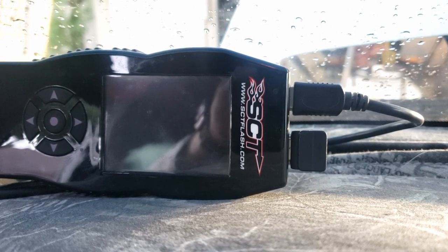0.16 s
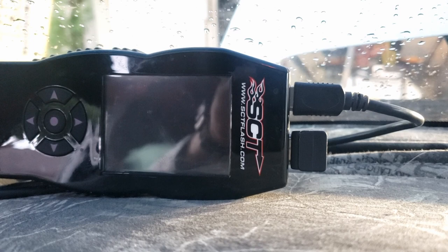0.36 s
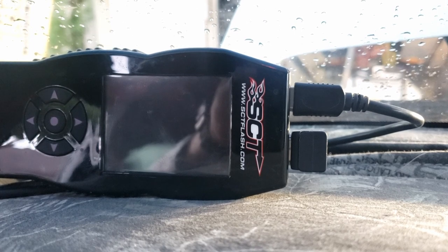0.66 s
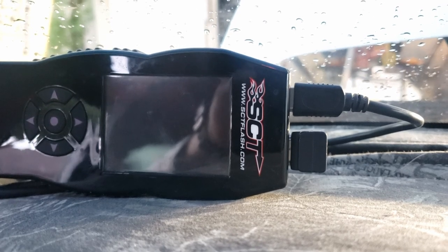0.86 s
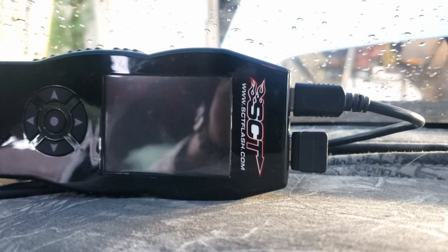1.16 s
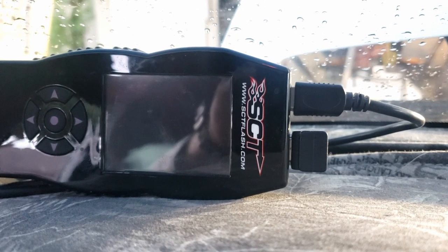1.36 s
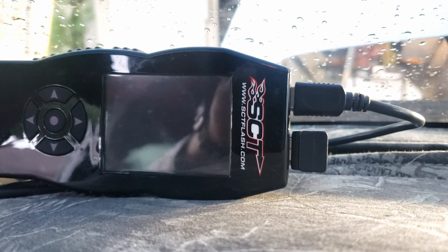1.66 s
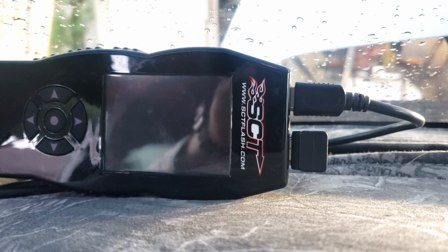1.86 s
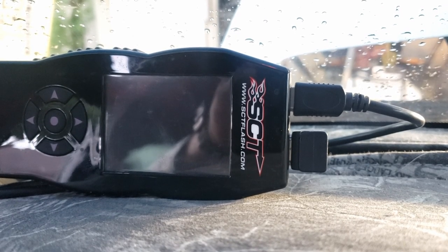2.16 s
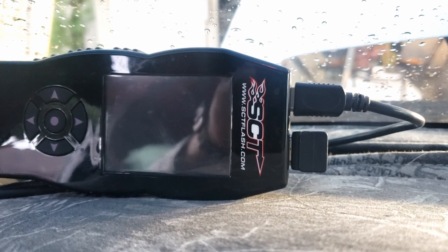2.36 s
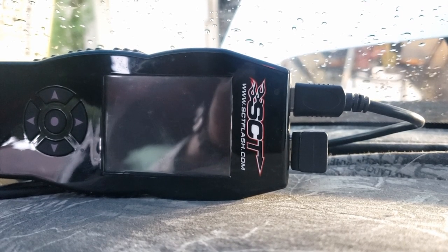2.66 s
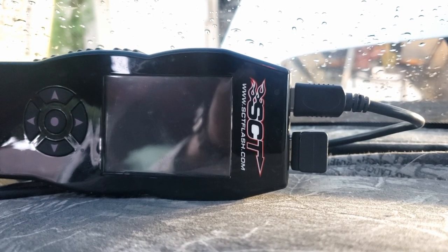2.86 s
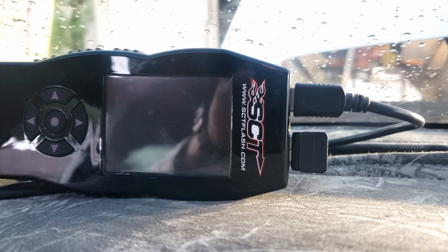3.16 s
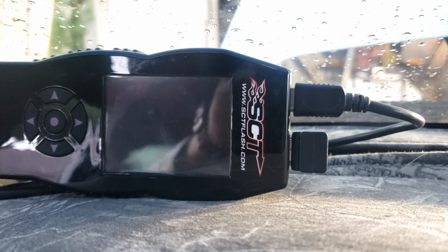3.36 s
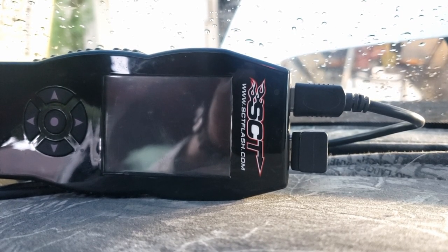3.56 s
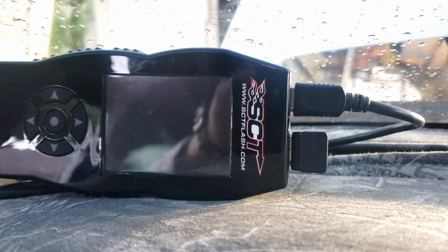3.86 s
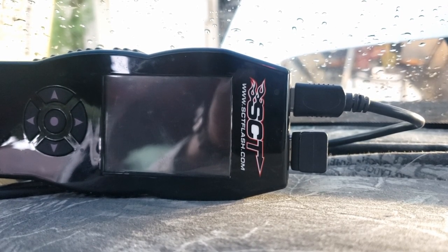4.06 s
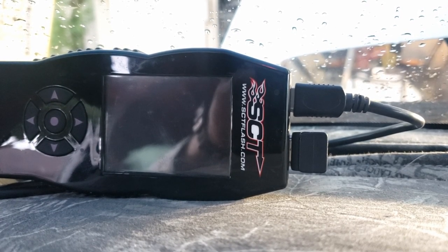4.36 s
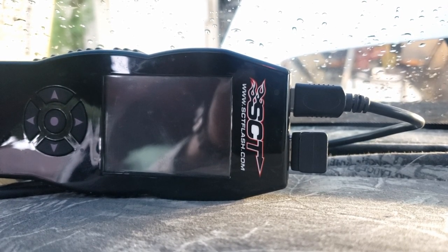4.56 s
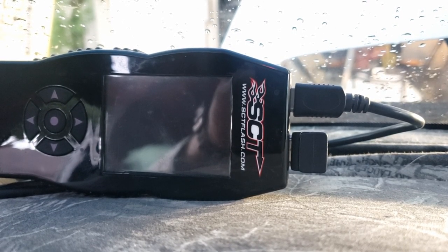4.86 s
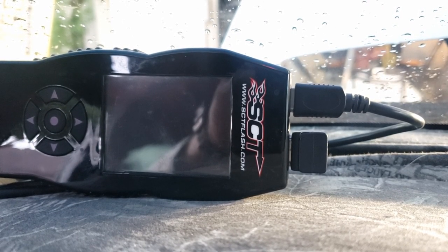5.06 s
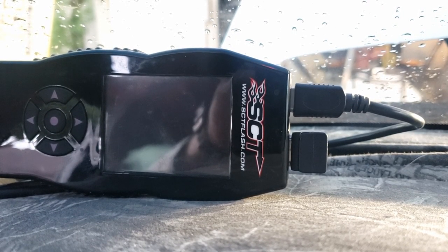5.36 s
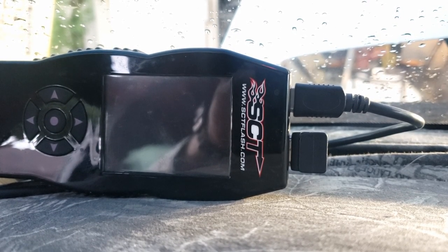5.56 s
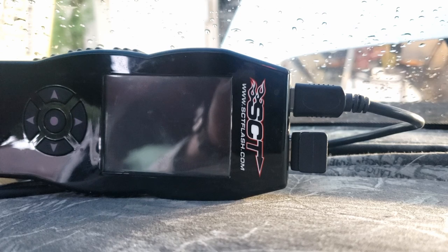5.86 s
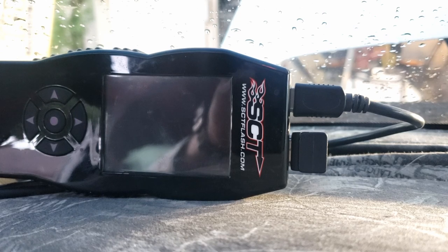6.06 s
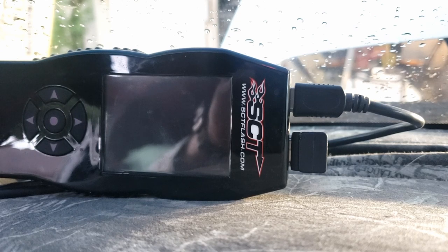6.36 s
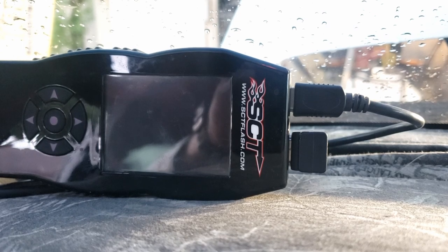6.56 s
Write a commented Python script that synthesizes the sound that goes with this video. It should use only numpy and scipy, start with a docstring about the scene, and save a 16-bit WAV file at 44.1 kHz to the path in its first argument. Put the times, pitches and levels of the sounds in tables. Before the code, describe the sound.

A diesel truck engine cranks briefly, catches, runs at a fast idle and settles to a steady clattering idle, heard inside the cab.

```python
"""A V8 diesel is cranked, catches, runs fast and sinks to idle, heard on the dashboard of the cab.
Each compression loads the starter, whose gear grinds and whines while the cab rocks on its mounts.
Each firing then excites the cab's modes; uneven cylinders give the lope, which changes when the fast
idle ends. Combustion clatter, knocks ringing the block and tones geared to the crank come through
the firewall, with rumble, hiss and a few bright ticks."""
import sys
import numpy as np
from scipy import signal
from scipy.fft import rfft, irfft, next_fast_len
from scipy.io import wavfile
from scipy.ndimage import uniform_filter1d

SR = 44100
rng = np.random.default_rng(int(sys.argv[2]) if len(sys.argv) > 2 else 0)


def store_pcm(level_fs):
    """Save levels as 16-bit WAV."""
    pcm = np.round(np.clip(level_fs, -1, 1) * 32767).astype(np.int16)
    wavfile.write(sys.argv[1], SR, np.atleast_2d(pcm).T)


N = 296793
T = np.arange(N) / SR
FIRING_FROM_S, SETTLE_FROM_S = .74, 3.4
BASS_LEFT_DB = -3.5  # left relative to right

# compression strokes: t/s, grind level/dB, gear level/dB, ring f/Hz, share of the passed rings,
# rocking level at the stroke/dB, rocking level after it/dB
STROKES = [(0.0094, -31.5, -35.5, 1190, 0.67, -29, -18.5), (0.0985, -29.5, -34.5, 1243, 0.097, -31, -18.5),
           (0.188, -30.5, -35, 1237, 0.48, -26, -16), (0.279, -30.5, -36.5, 1215, 0.49, -24.5, -19),
           (0.367, -31.5, -36, 1210, 0.55, -57, -15), (0.462, -32, -38.5, 1244, 0.66, -22.5, -22),
           (0.5465, -32, -35.5, 1214, 0.47, -33.5, -16.5), (0.6433, -30, -36.5, 1223, 0.31, -23, -21),
           (0.74, -31.5, -58, 1210, 0.37, -53, -20.5)]
# envelope of the clatter: t/s, level/dB
CLATTER_LEVEL = [(.75, -24.5), (.85, -30.5), (.97, -35), (1.15, -42), (1.5, -44), (2.9, -44), (4.6, -42.5),
                 (5.4, -42), (5.56, -42), (5.75, -42), (6.2, -41), (6.45, -39), (6.73, -39)]
# knocks of a cycle: crank angle/firings, f/Hz, width/octaves, relative level/dB, length/firings
KNOCKS = [(0.79, 1600, 0.24, 3, 0.17), (0.109, 2700, 0.3, 3, 1.3), (1.2, 2000, 0.17, 2.5, 0.31),
          (2.8, 2610, 0.14, 5.5, 0.42), (2.4, 2000, 0.085, 4.5, 0.18), (2.6, 1700, 0.063, 4.5, 0.28),
          (.8, 840, 0.9, 3.5, 0.25), (1.9, 1000, 0.27, 6, 0.23), (1.8, 970, 0.12, -0.5, 0.77),
          (3.756, 690, 0.54, 2, 0.35), (7.4, 1400, 0.42, -9.5, 0.34), (7.3, 1650, 0.99, -6.5, 0.34),
          (2.191, 977, 0.11, 7, 1.3), (7, 1510, 0.18, -15.5, 2.8)]
# modes of the engine block: f/Hz, width/Hz, share
BLOCK_MODES = [(600, 47, .3), (840, 30, 0.49), (1050, 72, 0.45), (1192, 20, 0.87), (1423, 20, 0.93),
               (1570, 60, 0.37), (1993, 45, 0.7), (2370, 50, 0.6), (2620, 110, .7), (2830, 110, 0.8)]
# left microphone relative to right: f/Hz, level/dB
LEFT_DB = [(60, -2.5), (200, -4.5), (380, 3.5), (700, -3.5), (1290, 8), (2380, 4.5), (4400, 5), (8120, 1.5),
           (15000, 2)]


def amp(db):
    """Amplitude ratio of a level in decibels."""
    return 10 ** (np.asarray(db, float) / 20)


def unit_rms(x):
    """Normalisation to unit mean power."""
    return x / np.sqrt(np.mean(x ** 2) + 1e-20)


def bell(x, centre, width):
    """Gaussian curve, down to 1/e one width from its centre."""
    return np.exp(-((x - centre) / width) ** 2)


def ramp(start_s, length_s):
    """Linear rise from 0 to 1."""
    return np.clip((T - start_s) / length_s, 0, 1)


def at_frequency(points, hz):
    """Interpolation along a logarithmic frequency axis."""
    f, value = np.transpose(points)
    return np.interp(np.log(hz + 1), np.log(f + 1), value)


def over_time(rows):
    """Linear interpolation in time, one curve for each column after the first."""
    s, *values = np.transpose(rows)
    return [np.interp(T, s, v) for v in values]


def add_at(out, s, sound):
    """Superposition of a sound that starts at time s."""
    out[..., round(s * SR):][..., :sound.shape[-1]] += sound


def resonate(x, hz, width):
    """A resonance that may glide, by heterodyning: shift hz to zero, smooth, shift back."""
    turn = np.exp(2j * np.pi * np.cumsum(hz * np.ones(len(x))) / SR)
    pole = np.exp(-np.pi * width / SR)
    return 2 * (turn * signal.lfilter([1 - pole], [1, -pole], x / turn)).real


def ringing(modes, rise_s):
    """Impulse response of damped modes: the wider a mode, the faster its sine decays."""
    t = T[:SR // 2]
    ring = sum(share * np.exp(-np.pi * width * t) * np.sin(2 * np.pi * hz * t)
               for hz, width, share in modes)
    return ring * (1 - np.exp(-t / rise_s))


def cyclic_blows(angle, blows, modes, level_db, scatter_db, rise_s=1e-5):
    """Impulse excitation: blows of scattered strength ring the modes once in every eight firings."""
    impulses = np.zeros(N)
    for place, db in blows:
        cycle = np.floor((angle - place) / 8)
        impulses += amp(db) * np.diff(cycle, prepend=cycle[0])
    impulses *= amp(level_db + scatter_db * rng.standard_normal(N))
    return signal.oaconvolve(impulses, ringing(modes, rise_s))[:N]


def block_modes_near(f, octaves):
    """Selective excitation: a knock drives mostly the block modes near its own pitch."""
    return [(hz, width, share * bell(np.log2(hz / f), 0, octaves)) for hz, width, share in BLOCK_MODES]


def at_microphones(mono, hz):
    """Level and time cues of a knock: the right channel is inverted and 20 samples late."""
    left_db = at_frequency(LEFT_DB, hz)
    return np.array([mono * amp(left_db / 2), -np.roll(mono, 20) * amp(-left_db / 2)])


def cab_noise(spectrum, size, shape=lambda s, hz: 1, angle=None):
    """Partly coherent noise at two microphones, scaled by shape; given an angle, part of it recurs."""
    # part of the noise that recurs each cycle: f/Hz, amplitude share
    recurring = [(100, .5), (400, .7), (900, .9), (1600, .88), (2100, .7), (3000, .58), (5000, .42),
                 (9000, .2)]
    # likeness of left and right: f/Hz, correlation
    coherence = [(60, 1), (290, 0.84), (640, 0.37), (2000, 0.51), (4000, 0.14), (15000, 0.12)]
    # lead of the left microphone: f/Hz, phase/rad
    phase_lead = [(45, -0.35), (190, -0.54), (330, 0.88), (520, 1.7), (780, 3), (1210, 4.5), (1720, 4.5),
                  (2840, 5), (4130, 13), (6200, 17), (8010, 21), (8440, 19), (9220, 19.5), (11400, 13),
                  (12700, 6), (16000, 12)]
    # peaks and a notch of the cab: f/Hz, width/Hz, gain/dB
    cab_colour = [(3390, 71, 0.5), (3480, 47, -9), (4270, 270, 4), (4730, 220, 1.5), (4920, 110, 3),
                  (5300, 240, 0.5), (6290, 1020, 6.5)]
    frames = dict(nperseg=size, noverlap=3 * size // 4)
    hz, s, (left, other) = signal.stft(rng.standard_normal((2, N)), SR, **frames)
    hz = hz[:, None]
    if angle is not None:
        first, second = rng.standard_normal((2, 2, 8192))[:, :, (angle % 8 * 1024).astype(int)]
        pattern = first * np.cos(.9 * T) + second * np.sin(.9 * T)  # drifts at 0.9 rad/s
        share = at_frequency(recurring, hz)
        fresh = np.sqrt(1 - share ** 2) * np.array([left, other])
        left, other = share * signal.stft(pattern, **frames)[2] + fresh
    same = at_frequency(coherence, hz)
    right = (same * left + np.sqrt(1 - same ** 2) * other) * np.exp(-1j * at_frequency(phase_lead, hz))
    balance = amp(at_frequency(LEFT_DB, hz) / 2)
    colour_db = sum(db * bell(hz, f, width) for f, width, db in cab_colour)
    in_band = (hz > spectrum[0][0]) & (hz < spectrum[-1][0])
    gain = amp(at_frequency(spectrum, hz) + colour_db) * in_band * shape(s, hz)
    out = signal.istft(np.array([left * balance, right / balance]) * gain, **frames)[1][:, :N]
    return out / np.sqrt(np.mean(out.mean(0) ** 2))


def through_covers(x):
    """Resonant transmission: block and covers favour narrow bands of the noise."""
    # resonances of block and covers: f/Hz, half-width/Hz, gain/dB
    cover_rings = [(850, 25, 1), (1053, 40, 2.5), (1210, 45, 5), (1402, 27, 4.5), (1578, 40, 4.5),
                   (1830, 26, 5), (2000, 42, 6), (2160, 41, 0.5), (2376, 30, 5.5), (2820, 45, 5),
                   (3050, 31, 2.5), (3510, 40, 2.5)]
    size = next_fast_len(N)
    hz = np.fft.rfftfreq(size, 1 / SR)
    lift_db = sum(db / (1 + ((hz - f) / width) ** 2) for f, width, db in cover_rings)
    return irfft(rfft(x, size) * amp(lift_db - 2.5), size)[:, :N]


def starter_whine():
    """Gear mesh under load: each compression slows the starter; its falling whine rings the housing."""
    # rings the whine passes: ratio to the mean main ring, width/Hz, level/dB, t into the stroke/s
    passed_rings = [(1.5, 41, -8, 0.0085), (1.36, 31, -0.5, 0.0069), (1.32, 16, -2, 0.026),
                    (1.1, 15, 5, 0.038), (0.92, 13, -11, 0.038), (.65, 30, -14, 0.038),
                    (2.4, 60, -10, 0.056), (2.4, 19, -8, 0.017), (3.8, 45, -13, 0.027),
                    (2.94, 15, -14, 0.045), (5.45, 42, -12, 0.033)]
    s, _, gear_db, ring_hz, passed_share, *_ = np.transpose(STROKES)
    lead_s, slowest_s, hold_s = .016, .065, .019
    t = T[:SR] + lead_s  # the whine starts to fall just before the grind
    stroke = np.clip(np.searchsorted(s, t) - 1, 0, None)
    age = np.maximum(t - s[stroke], 0)
    load = np.exp(-((age - .054) / .027) ** 4) + .25 * bell(age, .085, .0084)
    swoop_gain = .28 * np.exp(-(age / .096) ** 3) * np.clip(age / .0033, 0, 1)
    mesh_hz = ring_hz[stroke] * (1.13 + .31 * np.cos(np.pi * age / slowest_s))
    # a high rasp sags under load and climbs back
    high_hz = 3850 - 350 * np.cos(2 * np.pi * (age - slowest_s) / np.diff(s).mean())
    level = uniform_filter1d(amp(gear_db[stroke]), 400)
    out = np.zeros((2, N))
    for side, teeth in enumerate(rng.standard_normal((2, SR))):
        rasp = unit_rms(resonate(resonate(teeth, mesh_hz, 110), mesh_hz, 110))
        rasp += .86 * unit_rms(resonate(teeth, 2 * mesh_hz, 90))
        mesh_phase = 2 * np.pi * np.cumsum(mesh_hz) / SR + side
        swoop = .4 * rasp + 1.2 * np.cos(mesh_phase) + .5 * np.cos(2 * mesh_phase)
        main_ring = np.cos(2 * np.pi * np.cumsum(ring_hz[stroke]) / SR + side)
        main_ring += .4 * unit_rms(resonate(teeth, ring_hz[stroke], 50))
        passed = sum(amp(db) * bell(age, peak_s, hold_s)
                     * unit_rms(resonate(teeth, ratio * ring_hz.mean(), width))
                     for ratio, width, db, peak_s in passed_rings)
        housing = 1.35 * load * main_ring + passed_share[stroke] * passed
        high_rasp = amp(-20) * unit_rms(resonate(resonate(teeth, high_hz, 170), high_hz, 170))
        out[side, :SR] = level * (swoop_gain * swoop + housing + high_rasp)
    return out * amp([[6], [-.5]])


def starter_grind():
    """Amplitude-modulated noise: the gear grinds in a burst at each compression."""
    # grinding spectrum: f/Hz, relative density level/dB
    spectrum = [(47, -30), (80, 3), (122, -18), (232, 4), (330, -10), (480, -28.5), (768, -12.5),
                (877, -27.5), (1220, -8), (1860, -20), (2540, -20), (5170, -31.5), (6450, -36),
                (12000, -28), (16000, -39)]
    # resonances of the starter housing: f/Hz, width/Hz, gain/dB
    housing_rings = [(2300, 140, 3.5), (2630, 50, 3), (2860, 50, 2), (3200, 51, -2), (3530, 60, 2),
                     (4400, 74, -2), (5500, 130, 6), (5730, 70, 2), (6200, 80, 8.5), (6720, 90, 8),
                     (7320, 83, 12)]
    s, grind_db, *_ = np.transpose(STROKES)

    def bursts(t, hz):
        stroke = np.clip(np.searchsorted(s, t + .013) - 1, 0, None)
        age = t - s[stroke]
        floor = np.clip(.5 - .092 * np.log2((hz + 1) / 1000), .12, 1)  # duller between strokes
        floor = floor * (1 + .38 * bell(hz, 4000, 790)) * (t < .85)
        burst = np.exp(-(np.maximum(age, 0) / .063) ** 2.5) * np.clip(age / .019 + .67, 0, 1)
        rings_db = sum(db * bell(hz, f, width) for f, width, db in housing_rings)
        return amp(grind_db[stroke] - grind_db.mean() + rings_db) * (floor + burst)
    return amp(-43.5) * cab_noise(spectrum, 256, bursts)


def cab_shudder():
    """Forced vibration: the cab rocks on its mounts, checked at each stroke and swelling after it."""
    rock_hz, swell_s = 61.4, .052
    s, *_, checked_db, swell_db = np.transpose(STROKES)
    times = np.ravel([s, s + swell_s], "F")
    levels = amp(np.ravel([checked_db, swell_db], "F"))
    envelope = uniform_filter1d(np.interp(T, times, levels), 400) * np.clip((.85 - T) / .043, 0, 1)
    return np.sqrt(2) * envelope * np.cos(2 * np.pi * rock_hz * T)


def compression_thuds():
    """Impulse excitation: each stroke rings low modes, every second one 5 dB harder."""
    # modes of the thud: f/Hz, width/Hz, signed share
    modes = [(92, 8.7, 0.65), (121, 20, 0.39), (283, 4.2, 0.097), (335.5, 8.3, -0.15)]
    s, grind_db, *_ = np.transpose(STROKES)
    heavy = np.arange(len(s)) % 2 == 0
    blows = np.zeros(N)
    blows[np.round((s - .002) * SR).astype(int)] = amp(grind_db + 11.5 + 5 * heavy)
    thuds = signal.oaconvolve(blows, ringing(modes, rise_s=.0049))[:N]
    return thuds * amp([[BASS_LEFT_DB / 2], [-BASS_LEFT_DB / 2]])


def combustion_clatter(angle):
    """Cyclostationary noise: valves and combustion swell in set bands at set crank angles."""
    # clatter spectrum: f/Hz, relative density level/dB
    spectrum = [(350, -60), (600, -9.5), (627, -29), (837, 1.5), (915, -5.5), (1040, 1), (1230, 0),
                (1560, 0.5), (1740, -11), (2030, -7.5), (2900, -10), (3350, -14.5), (5050, -18.5),
                (5700, -24), (8500, -28.5), (11000, -36.5), (18700, -120)]

    def knocking(s, hz):
        crank = np.interp(s, T, angle)
        power = 1 + sum(amp(2 * db) * bell(np.log2((hz + 1) / f), 0, octaves)
                        * bell((crank - place) % 8, 0, length)
                        for place, f, octaves, db, length in KNOCKS)
        # once a cycle the pitch drops and climbs again; the upper band thins at the drop
        churn_hz = 1040 + 360 * ((crank - 1.6) % 8 / 8)
        churn_db = 4 * bell(hz, churn_hz, 120) - 6 * bell(hz, 1400, 150) * bell(crank % 8, 2.1, .8)
        power = power * amp(2 * churn_db * np.clip(s / SETTLE_FROM_S, 0, 1))
        return np.sqrt(power / power.mean(1, keepdims=True))
    return through_covers(cab_noise(spectrum, 512, knocking, angle))


def rumble(angle):
    """Low-frequency noise, partly periodic with the engine cycle."""
    # rumble spectrum: f/Hz, relative density level/dB
    spectrum = [(28, -41), (45, -11.5), (110, -8.5), (180, -10), (230, -17), (340, -21), (415, -29.5),
                (480, -24.5), (550, -27.5), (750, -29.5), (1000, -68)]
    # rumble relative to the clatter: t/s, level/dB
    level = [(.75, 8), (1.2, 10.5), (2.0, 9), (2.7, 12), (3.6, 8.5), (5.0, 9), (6.73, 7.5)]
    return amp(over_time(level)[0]) * cab_noise(spectrum, 2048, angle=angle)


def hiss():
    """Broadband hiss, rising 2 dB against the clatter as the fast idle ends."""
    # hiss spectrum: f/Hz, relative density level/dB
    spectrum = [(4120, -34.5), (7000, -3), (7450, -0.5), (9360, -0.5), (10900, 4), (12100, 4.5),
                (15100, -4.5), (16000, -2)]
    return amp(-19 + 2 * ramp(3.8, .45)) * cab_noise(spectrum, 256)


def block_knocks(angle):
    """Modal ringing: the same knocks strike the block in every cycle."""
    out = np.zeros((2, N))
    for place, hz, octaves, db, _ in KNOCKS:
        modes = block_modes_near(hz, octaves)
        knock = cyclic_blows(angle, [(place, db)], modes, 0, scatter_db=1.6, rise_s=.0048)
        out += at_microphones(knock, hz)
    return amp(-9.5) * unit_rms(out)


def catching():
    """Combustion transients: the first firings are decaying noise bursts over the run-up's swell."""
    # hard firings: t/s, relative level/dB
    firings = [(0.7363, -21), (0.7897, -42), (0.834, -22.5), (0.9009, -32), (0.9309, -38), (1.0032, -28),
               (1.0466, -36)]
    # their spectrum: f/Hz, relative density level/dB
    spectrum = [(88, -30), (150, -1), (209, -13), (244, -15), (368, -13), (439, -8.5), (923, -16.5),
                (1210, -13.5), (1830, -18), (2870, -13.5), (3490, -21.5), (5200, -32), (5790, -26),
                (6500, -40), (8400, -33.5), (11900, -32.5), (16000, -45)]
    peak_s, rise_db_per_s, fall_s, t60_s = .947, 41, .13, .12
    late = T - peak_s
    swell_db = -32 + rise_db_per_s * late.clip(None, 0) - 10 * (late.clip(0, 1) / fall_s) ** 2
    envelope = amp(swell_db) * ramp(.723, .015)
    for s, db in firings:
        decay_db = 60 * (T - s).clip(0, 1) / t60_s
        envelope += amp(db - 12 - decay_db) * ramp(s - .0065, .0065) * (T < s + 1)
    return through_covers(cab_noise(spectrum, 498)) * envelope


def firing_pings():
    """Free vibration of metal: hard first firings ring the block around one pitch each."""
    # pings: t/s, level/dB, f/Hz
    pings = [(.737, -25, 1750), (.742, -22, 3000), (.746, -30.5, 1226), (.76, -19, 1660), (.789, -33, 1550),
             (.798, -22, 2000), (.833, -27, 3010), (0.835, -20.5, 1560), (0.839, -19.5, 1120),
             (.842, -24, 2850), (.855, -36, 1190), (.87, -24, 2800), (.876, -23, 1100), (0.903, -18, 1310),
             (.915, -33, 1220), (.945, -34, 3000), (0.959, -29, 1250), (.932, -22, 2060),
             (0.979, -27, 2000), (1.003, -31, 2900), (1.022, -25.5, 1146), (1.05, -31, 1200)]
    out = np.zeros((2, N))
    for s, db, hz in pings:
        modes = [(hz, 70, .9)] + block_modes_near(hz, octaves=.076)
        add_at(out, s, at_microphones(amp(db) * ringing(modes, rise_s=.0019), hz))
    return out


def body_thumps():
    """Structure-borne sound: the catching engine jolts the body, one damped mode to a jolt."""
    # jolts: t/s, level/dB, f/Hz
    jolts = [(0.738, -36, 200), (0.765, -37, 244), (0.787, -24, 231), (0.81, -20, 377), (0.848, -18.5, 350),
             (0.871, -24, 270), (0.89, -16, 240), (0.915, -16.5, 247), (0.957, -19, 242)]
    out = np.zeros(N)
    for s, db, hz in jolts:
        add_at(out, s, amp(db + .5) * ringing([(hz, 53, 1)], rise_s=.003))
    return out * amp([[-1.5], [1.5]])


def crank_angle():
    """Phase as the integral of firing rate, in firings; a cycle of eight begins at 1 s."""
    # engine speed: t/s, firing rate/Hz
    speed = [(.74, 14), (.82, 30), (.9, 44.07), (1.0, 56.79), (1.2, 53.62), (1.5, 53.51), (2.4, 49.53),
             (2.75, 47.01), (4.1, 44.79), (4.5, 44.7), (4.75, 44.18), (5.3, 45.0), (6.73, 45.39)]
    firings = np.cumsum(over_time(speed)[0]) / SR
    return firings - firings[SR]


def exhaust_hum(angle):
    """The fundamental of the exhaust pulses: one period to a firing."""
    # envelope of the hum: t/s, level/dB
    level = [(.78, -38.5), (.9, -23.5), (1.07, -12.5), (1.17, -22), (2.5, -22.5), (2.9, -23.5),
             (3.3, -20.5), (3.6, -20.5), (4.2, -29.5), (5.0, -24), (5.4, -28), (6.73, -23.5)]
    hum_db = over_time(level)[0] - 99 * (T < FIRING_FROM_S)
    return np.sqrt(2) * amp(hum_db) * np.cos(2 * np.pi * (angle + .21))


def fast_idle_lope(angle):
    """Subharmonics: unequal cylinders ring the cab in a lope, while the evenly spaced firings make the cab
    boom."""
    # cold cylinders: crank angle/firings, level/dB
    cylinders = [(0.15, -2.3), (1.11, -3.6), (2.09, 0.0), (3.16, -1.1), (4.19, -4.7), (5.05, -0.5),
                 (6.12, -10.9), (7.18, -0.2)]
    # cab modes: f/Hz, width/Hz, signed share
    cab_modes = [(74.4, 6.2, 1.0), (103.4, 6.5, -0.61), (124.6, 6.0, 0.24)]
    # cab modes the even firings drive into a boom: f/Hz, width/Hz, signed share
    boom_modes = [(104.4, 6, 1), (158, 14, -.35)]
    # catch and fast idle: t/s, lope level/dB, boom level/dB
    levels = [(.74, -35, -54), (.8, -19.5, -25.5), (.97, -16, -21.5), (1.03, -2.5, -26), (1.07, -6.5, -1.5),
              (1.11, -10.5, -22.5), (1.18, -26, -19.5), (1.3, -6.5, -23.5), (1.45, -17.5, -22.5),
              (1.6, -33, -21), (1.9, -22, -19.5), (2.2, -12.5, -21.5), (2.6, -17, -22), (3.55, -13.5, -24),
              (3.9, -18.5, -25.5)]
    end_s, fade_db_per_s = levels[-1][0], 42.5
    gate_db = -99 * (T < FIRING_FROM_S) - fade_db_per_s * np.maximum(T - end_s, 0)
    lope_db, boom_db = over_time(levels)
    even_blows = [(k - .29, 0) for k in range(8)]
    lope = cyclic_blows(angle, cylinders, cab_modes, lope_db + gate_db, scatter_db=1.75)
    return lope + cyclic_blows(angle, even_blows, boom_modes, boom_db + gate_db, scatter_db=1)


def geared_tones(angle, clatter_dip_db):
    """Engine orders: parts driven by the crank sound at fixed multiples of the firing rate."""
    # orders: f/firing rate
    orders = [3.6, 4, 5, 6, 6.4, 7.2, 7.8, 8, 10, 10.8, 12, 13]
    # for each order: cold level/dB, warm level/dB, slow-idle level/dB
    levels = [(-48, -42.5, -43.5), (-47, -45, -44.5), (-45.5, -47, -45.5), (-54, -45.5, -44),
              (-57, -51, -49.5), (-49, -39, -40.5), (-60, -51, -50), (-57, -49, -48), (-64, -55, -58),
              (-62, -46, -45.5), (-63, -55, -58), (-68, -55, -57)]
    warmth = np.maximum(ramp(2.3, .5), .13)
    settled = ramp(SETTLE_FROM_S, .5)
    out = np.zeros(N)
    for order, (cold, warm, slow) in zip(orders, levels):
        waver = unit_rms(uniform_filter1d(rng.standard_normal(N), 6000))
        tone = np.cos(2 * np.pi * (order * angle + rng.random()) + .073 * waver)
        level_db = cold + (warm - cold) * warmth + (slow - warm) * settled
        out += np.sqrt(2) * amp(level_db + .5 * waver + .89 * clatter_dip_db - 2) * tone
    return out * ramp(.9, .16)


def ticks():
    """Decaying noise transients: bright ticks and a rustle; the first is the starter letting go."""
    # bursts: t/s, level/dB, rise time/s, 60 dB decay time/s
    bursts = [(0.983, -29, .003, 0.094), (1.305, -48, .015, .2), (2.059, -48, .002, .05),
              (2.0994, -49, .002, .05), (3.61, -51, .003, .05)]
    out, t = np.zeros((2, N)), T[:8192]
    for s, db, rise, t60 in bursts:
        white = rng.standard_normal((2, len(t)))
        bright = np.array([unit_rms(resonate(side, hz=12200, width=6000)) for side in white])
        add_at(out, s, bright * amp(db - 60 * t / t60) * np.minimum(t / rise, 1))
    return out


def injector_knocks():
    """Impact ringing: the sharpest injector knock of a cycle excites slightly detuned modes."""
    # knocks: t/s, level/dB
    knocks = [(2.8863, -44), (3.0579, -43), (3.2306, -42), (3.4057, -40), (3.5803, -37), (3.757, -33),
              (3.932, -36), (4.1091, -43), (4.2877, -42), (4.6458, -37), (5.5408, -36), (5.8965, -49),
              (6.2507, -39), (6.4264, -31), (6.6034, -37)]
    # modes they ring: f/Hz, width/Hz, share
    modes = [(2000, 90, .35), (2400, 110, .5), (2650, 160, 0.39), (2856, 80, 1), (3010, 90, .5)]
    out = np.zeros((2, N))
    for s, db in knocks:
        detuned = [(hz * rng.uniform(.985, 1.015), width, share) for hz, width, share in modes]
        ring = amp(db + 2.5) * ringing(detuned, rise_s=.0015)
        add_at(out, s, at_microphones(ring, modes[-1][0])[:, :4096])
    return out


def slow_idle_lope(angle, clatter_dip_db):
    """Subharmonics of the warm engine: another pattern of unequal cylinders rings the cab."""
    # warm cylinders: crank angle/firings, level/dB
    cylinders = [(-0.32, -5.2), (0.71, -0.7), (1.64, -10.6), (2.66, -5.0), (3.72, 0.0), (4.71, -11.0),
                 (5.65, -1.1), (6.74, -4.5)]
    # cab modes: f/Hz, width/Hz, signed share
    cab_modes = [(81.9, 6.0, 0.29), (105.1, 8.3, 0.89), (122.7, 14.5, -1.0), (123.6, 6.0, 0.82),
                 (176.6, 6.0, 0.16)]
    risen_s, rise_db_per_s = 3.55, 47
    level_db = -13 + 1.84 * clatter_dip_db - rise_db_per_s * np.maximum(risen_s - T, 0)
    return cyclic_blows(angle, cylinders, cab_modes, level_db, scatter_db=.36)


def spread_bass(mono):
    """Phase and level cues of the bass at the two microphones."""
    # lead of the left microphone: f/Hz, phase/rad
    phase_lead = [(45, .42), (105, .29), (180, .26), (325, -.22), (490, -.07)]
    size = next_fast_len(N)
    lead = np.exp(1j * at_frequency(phase_lead, np.fft.rfftfreq(size, 1 / SR)))
    left = irfft(rfft(mono, size) * lead, size)[:N]
    return np.array([left * amp(BASS_LEFT_DB / 2), mono * amp(-BASS_LEFT_DB / 2)])


def scene():
    """Superposition of all sources; one crank angle keeps the cyclic ones in step."""
    angle = crank_angle()
    clatter_db = over_time(CLATTER_LEVEL)[0]
    clatter_dip_db = np.minimum(clatter_db - clatter_db[-1], 0)  # below its final level
    bass = cab_shudder() + exhaust_hum(angle) + fast_idle_lope(angle)
    bass += slow_idle_lope(angle, clatter_dip_db) + geared_tones(angle, clatter_dip_db)
    running = combustion_clatter(angle) + rumble(angle) + hiss() + block_knocks(angle)
    running *= amp(clatter_db) * ramp(.7, .4)
    catch = catching() + firing_pings() + body_thumps()
    starter = starter_whine() + starter_grind() + compression_thuds()
    return starter + catch + running + spread_bass(bass) + ticks() + injector_knocks()


def record(dry):
    """Microphone bass roll-off, clipping and band limit."""
    clipped = signal.sosfilt(signal.butter(1, 12., "high", fs=SR, output="sos"), dry).clip(-1, 1)
    low_pass = signal.firwin(511, 15900, window=("kaiser", 9), fs=SR)
    return signal.oaconvolve(clipped, low_pass[None], "same")


dry = scene()
out = record(dry)
store_pcm(out)
```